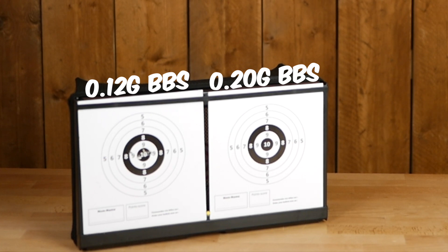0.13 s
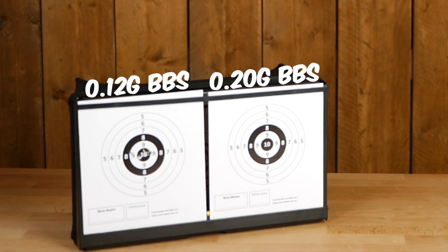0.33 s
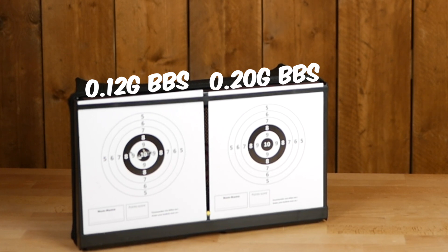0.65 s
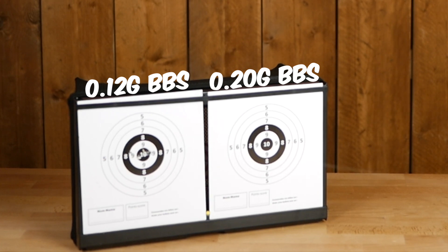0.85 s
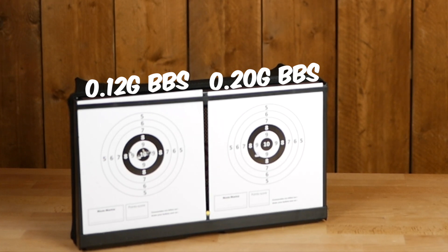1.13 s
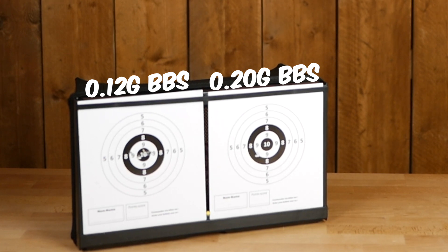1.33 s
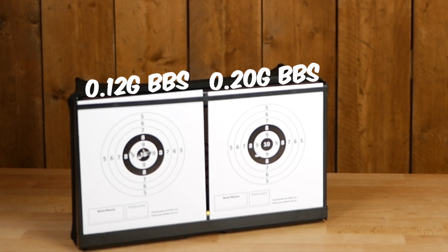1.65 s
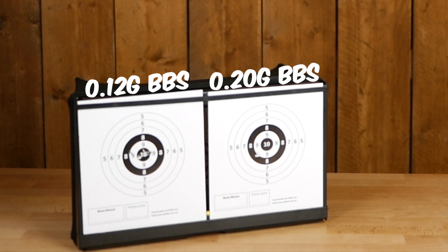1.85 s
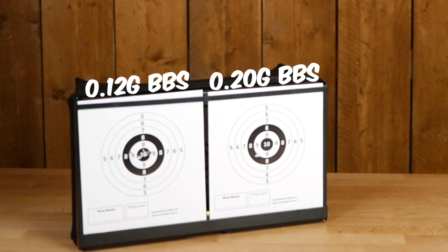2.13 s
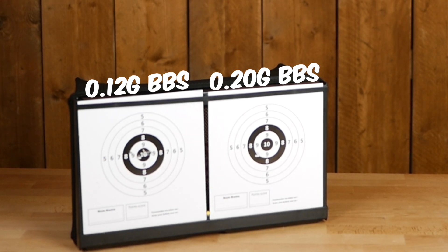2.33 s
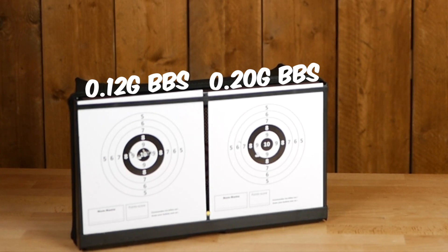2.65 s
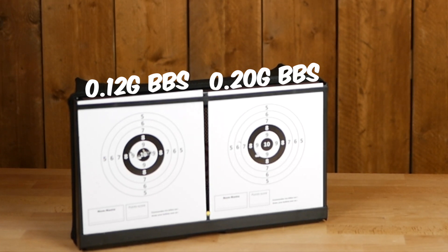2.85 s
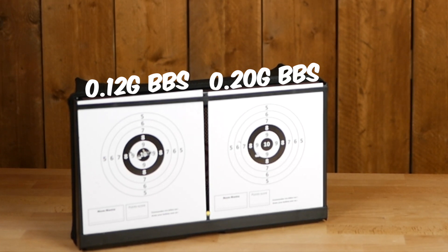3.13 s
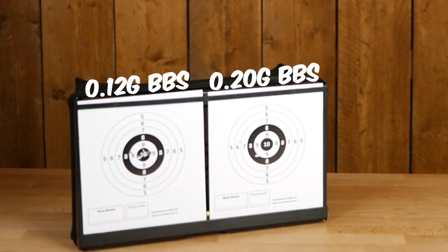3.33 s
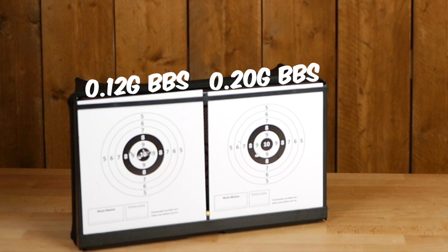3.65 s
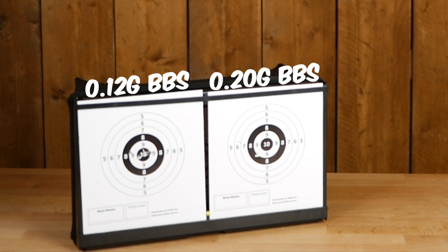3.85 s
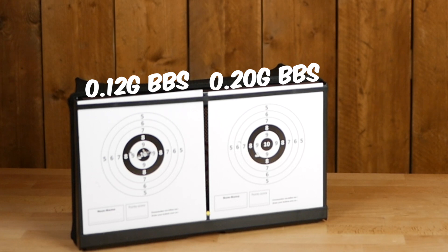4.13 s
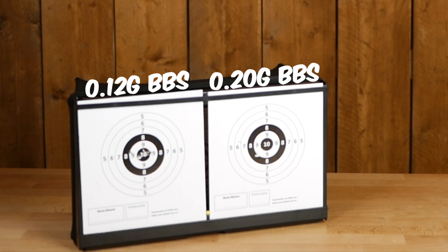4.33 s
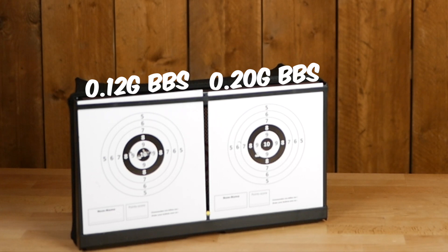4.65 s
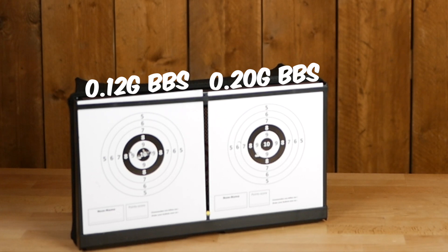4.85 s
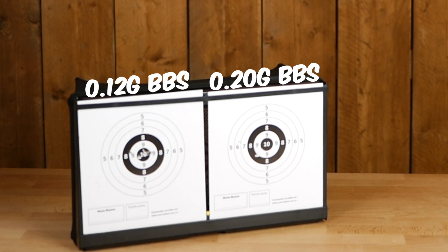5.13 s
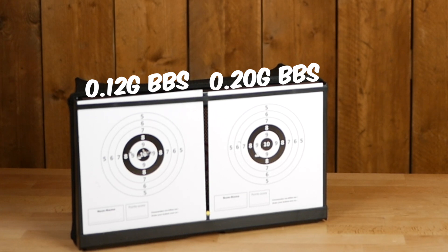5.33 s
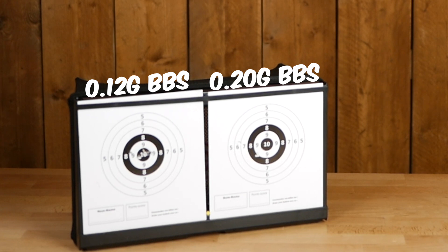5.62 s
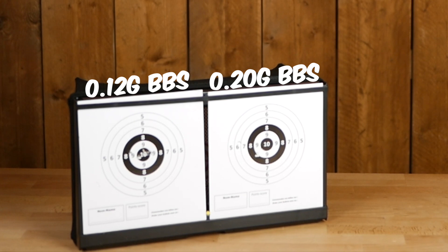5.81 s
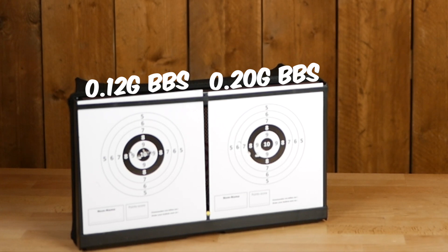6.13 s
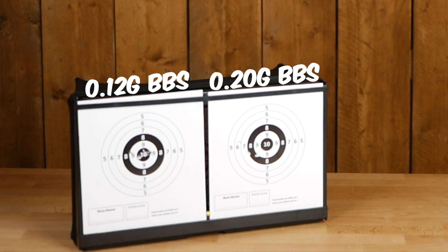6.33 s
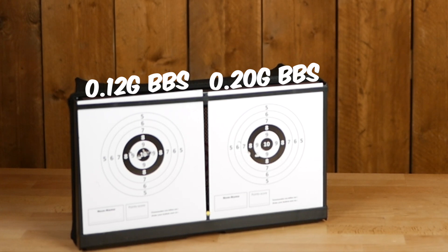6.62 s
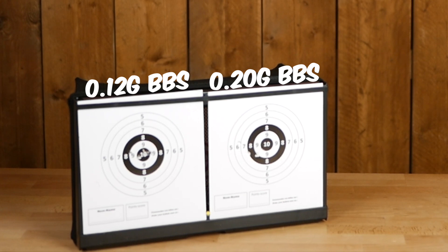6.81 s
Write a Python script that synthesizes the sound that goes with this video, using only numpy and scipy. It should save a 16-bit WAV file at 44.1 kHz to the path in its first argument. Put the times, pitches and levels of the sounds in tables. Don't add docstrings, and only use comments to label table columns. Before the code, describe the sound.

A quiet wooden room with low rumble, faint hiss and motor hum, heard from beside a paper target. A slight hand rustle at 0.14 seconds, then a plastic slide scrapes forward and clicks home at 0.25-0.35, with faint trigger creaks around 0.6. At 0.88 a spring piston slams across the room, mostly reflections, and 35 milliseconds later a pellet cracks the paper close by, overloading. Small taps in the target box and floor bounces follow until 1.55. The slide snaps back at 1.7 and returns at 1.95. Similar shots come at 2.5, 4.25 and 5.97, each followed by pellet taps and bright skips, with racking at 3.2 and 3.55, then 5.05 and 5.35. The rumble swells near 3.9; a distant vehicle drone rises faintly from 4.4. A final backward rack clacks at 6.75.

```python
import sys
import numpy as np
from scipy import signal
from scipy.fft import rfft, irfft, next_fast_len
from scipy.io import wavfile
from scipy.ndimage import uniform_filter1d

SR = 44100
rng = np.random.default_rng(int(sys.argv[2]) if len(sys.argv) > 2 else 0)


def voltage_ratio(level):
    return 10 ** (np.asarray(level, float) / 20)


def generate_wav(sig):
    pcm = np.round(np.clip(np.atleast_2d(sig).T, -1, 1) * 32767).astype(np.int16)
    wavfile.write(sys.argv[1], SR, pcm)


N = 307806
TIME = np.arange(N) / SR

# (frequency [Hz], level [dB])
AIR = [(12, -31.5), (20, -5.5), (60, -1), (142, 0), (310, -17.5), (357, -19.5), (434, -31.5), (499, -25),
       (678, -35.5), (849, -36), (3250, -44.5), (6000, -49.5), (9140, -47), (13500, -49), (16000, -48.5)]
AIR_DB = -52
RUMBLE_DB, PASSING_DB, PASSES_S, PASSING_S = -9.5, 7, 3.9, .9
# (frequency [Hz], level [dB])
MOTOR = [(75.4, -65.5), (150.7, -60), (226.1, -67), (301.5, -70.5)]
# (time [s], level [dB])
MOTOR_LOAD = [(0, -8), (1.9, -2), (3.2, 2), (4.1, -0.5), (4.6, -3.5), (5.8, -2.5), (6.4, 1), (6.98, -0.5)]
MAINS_DB, SURGE_DB, SURGE_S, MAINS_SAG_DB = -62.5, 15, 0.2, -11.5
# (time [s], pitch [Hz], level [dB])
VEHICLE = [(4.4, 60.9, -49.5), (4.63, 64.9, -57.5), (4.92, 64.46, -56), (5.114, 69.4, -66),
           (5.203, 73.5, -52), (5.571, 79.35, -56), (5.92, 75.7, -66), (6.501, 94.4, -73),
           (7.05, 97.1, -51.5)]

# (time [s], level [dB], brightness [dB])
BOUNCES = [(.9572, -25, -11), (1.1554, -39, -16), (1.1834, -17.5, 6.5), (1.2137, -32.5, -4),
           (1.4686, -40, 2), (2.5742, -18.5, -1), (2.6545, -20, 11.5), (2.7244, -46, 3), (2.7574, -21, 7.5),
           (2.82, -28, -8.5), (2.8794, -43.5, -14), (4.0899, -58.5, -7), (4.3288, -24.5, -33),
           (4.4143, -27, -1), (4.4999, -20.5, 6.5), (4.5301, -27, 2), (4.7695, -35.5, 14),
           (4.8994, -55.5, 5), (6.0437, -30, -19), (6.0838, -16.5, -13), (6.1768, -15, 5.5),
           (6.2719, -21, -1), (6.2805, -17, 4), (6.3629, -31.5, -6)]
# (frequency [Hz], density [dB per Hz])
BOARDS = [(240, -43.5), (400, -7), (719, -3.5), (1420, -5), (3500, 2.5), (4900, -7), (6640, -8.5),
          (12500, -20), (16000, -25)]
BOARD_BASS_DB, DULL_BASS, RATTLE_S = 4, .3, 0.00027
# (time [s], level [dB], panel ring [Hz], softness [dB])
TAPS = [(1.14, -34.5, 676, 28), (1.178, -24.5, 1030, -4), (1.231, -28, 680, 7), (1.336, -30, 1025, 5),
        (1.385, -33, 700, 3), (1.551, -47.5, 502, 25), (2.618, -17.5, 1000, -1), (4.55, -30, 730, 20),
        (4.581, -26, 1150, -4), (4.634, -28.5, 597, 4), (4.753, -29, 630, 3.5), (4.802, -32, 754, 7.5),
        (4.895, -39, 668, 19.5), (6.212, -30.5, 1250, -3), (6.298, -31, 1250, -8)]
# (frequency [Hz], density [dB per Hz])
TRAP = [(120, -33), (200, 2), (640, 3.5), (1440, 4), (1610, 2.5), (1890, 7), (2520, -3.5), (3350, -2),
        (4400, -12), (9000, -35), (11700, -70), (19800, -120)]
TAP_TREBLE_DB, SOFT_DULLS, TAP_S = -2.5, .35, 0.0023

# (frequency [Hz], density [dB per Hz])
PLASTIC = [(180, -64.5), (300, -29), (372, -23), (519, -25), (584, -15), (870, -15.5), (1080, -8.5),
           (1720, -10), (2140, -5.5), (2570, -8), (3460, -3), (5340, -13), (7690, -18.5), (13300, -28.5),
           (16000, -40.5)]
# (time [s], level [dB], length [s], ring [Hz])
TRIGGER = [(0.557, -48.5, 0.094, 2900), (0.607, -49.5, 0.036, 3406), (2.205, -54.5, .02, 2800),
           (2.228, -49, .001, 8500), (2.2296, -40.5, 0.0024, 3000), (2.2425, -45.5, .0027, 3200),
           (2.28, -57, .0081, 3100), (2.915, -53, 0.02, 3080), (2.963, -58, .022, 3120),
           (3.83, -50, 0.047, 3000), (3.95, -62.5, .046, 3223), (5.585, -52.5, .03, 2020),
           (5.612, -48.5, .04, 2870), (5.679, -57.5, .028, 2880)]
LONGEST_TICK_S = .01
# (let go [s], sear catches [s])
PULLS = [
    (1.663, 1.7225),
    (3.21, 3.270),
    (5.0255, 5.0843),
    (6.7194, 6.775),
]
# (scrape [dB], stop [dB])
PULL_DB = [(-28, -16), (-27, -17), (-26, -18), (-25, -18)]
# (starts [s], picks up a pellet [s], home [s])
RETURNS = [
    (.2505, .283, .347),
    (1.937, 1.948, 2.008),
    (3.512, 3.536, 3.590),
    (5.303, 5.3228, 5.377),
]
# (pick-up [dB], home [dB])
RETURN_DB = [(-28, -25.5), (-27, -29), (-29, -25), (-26, -26.5)]
# (time [s], level [dB], length [s])
GRIPS = [(0.1385, -40.5, 0.029), (1.8493, -38, 0.052), (3.1163, -43.5, 0.033), (3.4257, -39.5, 0.018),
         (4.919, -45.5, 0.036), (5.21, -40, .027), (5.229, -35, 0.0037), (6.621, -48.5, 0.026),
         (6.632, -45, 0.0025), (6.889, -37, 0.028)]
# (bass [dB], treble [dB])
LET_GO, DRAG, STOP = (3.96, -7), (2.5, 1.5), (-8.5, 0.33)
EASE, FEED, HOME, HAND = (4, -5), (10, 2.7), (13, 1.5), (5.2, -1.8)
LET_GO_DB, CREEP_DB, SEAR_DB, SLAM_DB = -6.5, -5, -8.5, 0.5
SPEEDS_UP = .35
SLAM_AFTER_S, SHUDDER_S, CLACK_S = 0.011, .026, 0.0025
EASE_DB, FEED_DB, LATCH_DB, SETTLE_DB = -9.5, 0.5, 1.5, -2.5
LATCH_AFTER_S, SETTLE_S, SEAT_AFTER_S = 0.0065, 0.034, .005
LAST_STOP_S, LAST_STOP_DB = 0.0002, -30
SWELL = 0.21

# (time [s], level [dB], bass [dB], treble [dB], contact [s])
HITS = [
    (.91375, -1, 0, 0, .0006),
    (2.52514, -1, 0, 0, .0006),
    (4.27727, -1, 0, 0, .0006),
    (5.99627, -1.5, 0, 0, .0006),
]
# (frequency [Hz], density [dB per Hz])
PAPER = [(47, -48), (80, -17.5), (687, -8), (917, -6), (1600, -0.5), (1900, -0.5), (2660, -2.5),
         (3470, -5.5), (5400, -12), (9400, -20), (16000, -29.5)]
# (frequency [Hz], level [dB], decay T60 [s])
PAPER_RING = [(3010, 2.5, 0.0048), (1150, -11, 0.0098)]
# (delay [s], level [dB])
NEAR_ECHOES = [(.0021, -11.5), (.0051, -12.5), (.0069, -16), (.011, -20)]
# (time [s], level [dB], bass [dB], treble [dB], contact [s])
SHOTS = [
    (.8778, -7.5, 0.5, -1.5, 0.0048),
    (2.4890, -8, -0.5, 0, .003),
    (4.2398, -8.5, 2.5, 0.5, 0.0033),
    (5.9600, -8, 2.5, -1, 0.0042),
]
# (frequency [Hz], density [dB per Hz])
PISTON = [(35, -45.5), (60, -22), (315, -7), (458, -13.5), (1010, -6), (1700, -11.5), (1910, 0.5),
          (2410, -3), (3600, 3), (5210, -9), (7750, -14.5), (14200, -23), (16000, -37.5)]
# (frequency [Hz], level [dB], decay T60 [s])
THUMP = [(142, -32.5, 0.46), (169, -21.5, 0.15), (222, -27.5, 0.25), (321, -23.5, .15)]
# (frequency [Hz], T60 [s])
ROOM_T60 = [(100, 0.31), (260, 0.39), (700, 0.52), (1840, 0.42), (4850, 0.43), (12800, 0.3)]
# (frequency [Hz], level [dB])
MICROPHONE = [(20, -15), (45, -2), (90, -1), (2400, 0), (3400, 1.5), (4400, 0), (5000, -0.5), (7000, 0.5),
              (16000, 0.5)]
TOP_HZ = 15900


def colour(table, size):
    hz, db = np.transpose(table)
    return np.interp(np.log(np.fft.rfftfreq(size, 1 / SR) + 1), np.log(hz), db)


def causal(db):
    c = irfft(db * np.log(10) / 20)
    c[1:len(c) // 2] *= 2
    c[len(c) // 2 + 1:] = 0
    return np.exp(rfft(c))


def unit(x):
    return x / np.sqrt(np.sum(x ** 2))


def walk(rate):
    k = int(SR / rate)
    held = np.repeat(rng.standard_normal(N // k + 1), k)
    return uniform_filter1d(uniform_filter1d(held, k), k)[:N]


def sine(phase, db):
    return np.sqrt(2) * voltage_ratio(db) * np.sin(phase)


def contacts(events, body, grain_db, gain_db, single=True, swell=.02, ring_db=0, ring_width_hz=100,
             bass_hz=1200, treble_hz=5500, size=4096):
    out, t, hz = np.zeros(N + size), np.arange(size) / SR, np.fft.rfftfreq(size, 1 / SR)
    noise = rng.standard_normal((len(events), size))
    sizes = rng.exponential(size=(len(events), size))
    for (s, db, bass_db, treble_db, length, *ring_hz), knocks in zip(events, noise * voltage_ratio(grain_db * sizes)):
        if not single:
            knocks = knocks * (1 - np.exp(-t / (swell * length)))
        steepness = 2 if single else 4
        knocks = rfft(knocks * np.exp(-(t / max(length, 1 / SR)) ** steepness))
        shade = colour(body, size)
        shade = shade + bass_db / (1 + (hz / bass_hz) ** 2)
        shade = shade + treble_db / (1 + (treble_hz / (hz + 1)) ** 2)
        shade = shade + sum(ring_db / (1 + ((hz - f) / ring_width_hz) ** 2) for f in ring_hz)
        if single:
            shade = shade - 20 * np.log10(abs(knocks) + np.mean(abs(knocks)) / 20)
        i = int(s * SR)
        out[i:i + size] += voltage_ratio(db + gain_db) * unit(irfft(knocks * causal(shade)))
    return out[:N]


def rings(events, modes, gain_db, rise_s):
    blows, t = np.zeros(N), TIME[:SR]
    for s, db, *_ in events:
        blows[int(s * SR)] = voltage_ratio(db + gain_db)
    swing = sum(-voltage_ratio(db - 60 * t / t60) * np.sin(2 * np.pi * f * t) for f, db, t60 in modes)
    return signal.fftconvolve(blows, swing * (1 - np.exp(-t / rise_s)))[:N]


def room(rise_s, onset_s, early_db, early_s, sparse_db, edge=2, size=32768):
    t, hz = np.arange(size) / SR, np.fft.rfftfreq(size, 1 / SR) + 1
    noise = rng.standard_normal(size)
    spikes = np.minimum(rng.exponential(size=size), 3)
    spectrum = rfft(noise * voltage_ratio(sparse_db * spikes * np.exp(-t / .03)))
    band_hz, decays = np.transpose(ROOM_T60)
    tail = 0
    for pick, t60 in zip(np.eye(len(decays)), decays):
        share = np.interp(np.log(hz), np.log(band_hz), pick)
        tail = tail + irfft(spectrum * share) * voltage_ratio(-60 * t / t60)
    swell = 1 - np.exp(-np.maximum(t - onset_s, 0) / rise_s)
    return unit(tail * swell * (1 + voltage_ratio(early_db) * np.exp(-(t / early_s) ** edge)))


def heard(x, response, direct_db, echoes=(), travel_s=0):
    path = response.copy()
    path[0] += voltage_ratio(direct_db)
    for s, db in echoes:
        path[int(s * SR)] += voltage_ratio(direct_db + db)
    return signal.fftconvolve(x, np.append(np.zeros(int(travel_s * SR)), path))[:N]


def room_air():
    size = next_fast_len(N)
    hz = np.fft.rfftfreq(size, 1 / SR)
    air = rfft(rng.standard_normal(size)) * voltage_ratio(colour(AIR, size))
    air = air * voltage_ratio(AIR_DB) / np.std(irfft(air, size))
    low = 1 / (1 + (hz / 350) ** 4)
    passing_db = PASSING_DB / (1 + ((TIME - PASSES_S) / PASSING_S) ** 2)
    rumble = irfft(air * low, size)[:N] * voltage_ratio(RUMBLE_DB + passing_db + 2.0 * walk(2))
    hiss = irfft(air * (1 - low), size)[:N] * voltage_ratio(1.5 + 1.5 * walk(4))
    return rumble + hiss


def motor_hum():
    hum = sum(sine(2 * np.pi * f * TIME + 0.58 * walk(6.2), db + 2.3 * walk(6.6)) for f, db in MOTOR)
    load_s, load_db = np.transpose(MOTOR_LOAD)
    sag_db = MAINS_SAG_DB * np.exp(-((TIME - 5.0) / 0.83) ** 2)
    mains_db = MAINS_DB + SURGE_DB * np.exp(-TIME / SURGE_S) + sag_db
    mains = sine(2 * np.pi * 48.4 * TIME + .8 * walk(2.3), mains_db)
    return hum * voltage_ratio(np.interp(TIME, load_s, load_db)) + mains


def far_vehicle():
    s, note_hz, note_db = np.transpose(VEHICLE)
    phase = 2 * np.pi * np.cumsum(np.interp(TIME, s, note_hz)) / SR
    fade = np.clip(np.minimum(TIME - s[0], s[-1] - TIME) / 0.061, 0, 1)
    return fade * sine(phase, np.interp(TIME, s, note_db))


def floor_bounces(board_room):
    ticks = [(s, db, BOARD_BASS_DB - DULL_BASS * bright_db, bright_db, RATTLE_S)
             for s, db, bright_db in BOUNCES]
    bounces = contacts(ticks, BOARDS, grain_db=1.0, gain_db=16.5)
    return heard(bounces, board_room, direct_db=-9.5, travel_s=.001)


def trap_taps():
    box = room(rise_s=0.00059, onset_s=0, early_db=2.0, early_s=0.015, sparse_db=6)
    knocks = [(s, db, soft_db, TAP_TREBLE_DB - SOFT_DULLS * soft_db, TAP_S, hz)
              for s, db, hz, soft_db in TAPS]
    taps = contacts(knocks, TRAP, grain_db=2.0, gain_db=17.5, ring_db=7.5, ring_width_hz=65, treble_hz=3000)
    return heard(taps, box, direct_db=-4, travel_s=.001)


def trigger_creaks(board_room):
    moves = [(s, db, 0, -1.5, length, hz) for s, db, length, hz in TRIGGER]
    ticks = [move for move in moves if move[4] < LONGEST_TICK_S]
    creeps = [move for move in moves if move[4] >= LONGEST_TICK_S]
    trigger = contacts(ticks, PLASTIC, grain_db=3, gain_db=17, ring_db=14.5, ring_width_hz=270)
    trigger = trigger + contacts(creeps, PLASTIC, grain_db=2.5, gain_db=16, ring_db=10.5,
                                 ring_width_hz=600, size=8192)
    return heard(trigger, board_room, direct_db=-2.5)


def strokes():
    scrapes, clacks = [], []
    shudders = [(s, db, *HAND, length) for s, db, length in GRIPS]
    shudders += [(LAST_STOP_S, LAST_STOP_DB, *LET_GO, .012)]
    for (go, sear), (drag_db, stop_db) in zip(PULLS, PULL_DB):
        fast = go + SPEEDS_UP * (sear - go)
        scrapes += [(fast, drag_db, *DRAG, sear - fast)]
        shudders += [(go, drag_db + CREEP_DB, *LET_GO, sear - go),
                     (sear, stop_db, *STOP, SHUDDER_S)]
        clacks += [(go, drag_db + LET_GO_DB, *LET_GO, CLACK_S),
                   (sear, stop_db + SEAR_DB, *STOP, CLACK_S),
                   (sear + SLAM_AFTER_S, stop_db + SLAM_DB, *STOP, CLACK_S)]
    for (go, feed, home), (feed_db, home_db) in zip(RETURNS, RETURN_DB):
        scrapes += [(go, feed_db + EASE_DB, *EASE, feed - go),
                    (feed, feed_db + FEED_DB, *FEED, home - feed)]
        shudders += [(home, home_db + SETTLE_DB, *HOME, SETTLE_S)]
        clacks += [(feed, feed_db - 2.5, *FEED, CLACK_S),
                   (feed + LATCH_AFTER_S, feed_db + LATCH_DB, *FEED, CLACK_S),
                   (home + SEAT_AFTER_S, home_db, *HOME, CLACK_S)]
    return scrapes, shudders, clacks


def slide_racking():
    scrapes, shudders, clacks = strokes()
    slide = contacts(scrapes, PLASTIC, grain_db=4.5, gain_db=19.5, single=False, swell=SWELL, size=8192)
    slide = slide + contacts(shudders, PLASTIC, grain_db=4.5, gain_db=19.0, single=False, size=8192)
    slide = slide + contacts(clacks, PLASTIC, grain_db=4.5, gain_db=14)
    slide_room = room(rise_s=.002, onset_s=0, early_db=2, early_s=.025, sparse_db=3)
    return heard(slide, slide_room, direct_db=-7)


def paper_crack():
    near_room = room(rise_s=0.0045, onset_s=0.0019, early_db=12.5, early_s=0.0032, sparse_db=2)
    burst = contacts(HITS, PAPER, grain_db=3.5, gain_db=11)
    burst = heard(burst, near_room, direct_db=6.0, echoes=NEAR_ECHOES)
    sheet = rings(HITS, PAPER_RING, gain_db=10.5, rise_s=.00005)
    faint_echoes = [(s, db - 12.5) for s, db in NEAR_ECHOES]
    return burst + heard(sheet, near_room * voltage_ratio(-13.0), direct_db=-2.5, echoes=faint_echoes)


def piston_slam():
    far_room = room(rise_s=.005, onset_s=.0022, early_db=0, early_s=.026, sparse_db=4, edge=4)
    slam = heard(contacts(SHOTS, PISTON, grain_db=4, gain_db=22), far_room, direct_db=-30)
    return slam + rings(SHOTS, THUMP, gain_db=5.5, rise_s=0.0049)


def scene():
    board_room = room(rise_s=.001, onset_s=0, early_db=7, early_s=0.011, sparse_db=3.5, edge=1.2)
    mid = room_air() + motor_hum() + far_vehicle()
    mid = mid + floor_bounces(board_room) + trap_taps()
    mid = mid + trigger_creaks(board_room) + slide_racking()
    mid = mid + paper_crack() + piston_slam()
    side = voltage_ratio(-25) * mid * walk(200)
    return np.array([mid + side, mid - side])


def band_limit(x):
    return signal.sosfilt(signal.butter(12, 16440, fs=SR, output="sos"), x)


def record(dry):
    microphone = irfft(causal(colour(MICROPHONE, size=8192)))
    coloured = signal.fftconvolve(dry, microphone[None], axes=1)[:, :N]
    top_cut = signal.ellip(8, .2, 50, TOP_HZ, fs=SR, output="sos")
    clipped = np.clip(signal.sosfilt(top_cut, coloured), -1, 1)
    return band_limit(clipped)


dry = scene()
out = record(dry)
generate_wav(out)
```